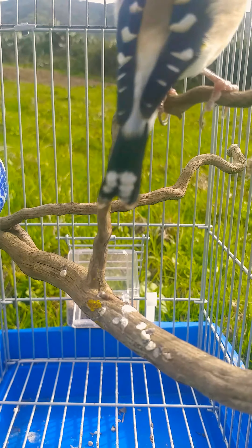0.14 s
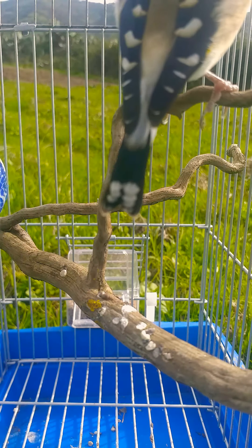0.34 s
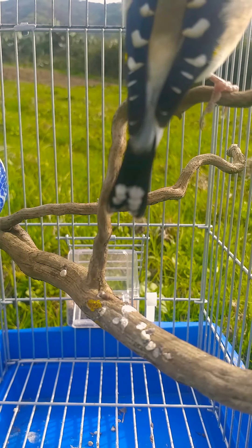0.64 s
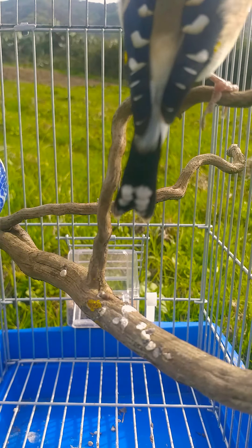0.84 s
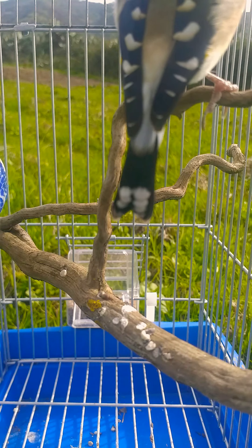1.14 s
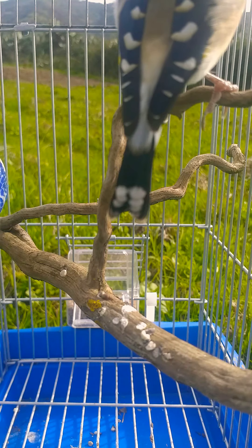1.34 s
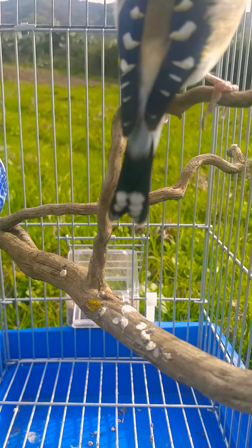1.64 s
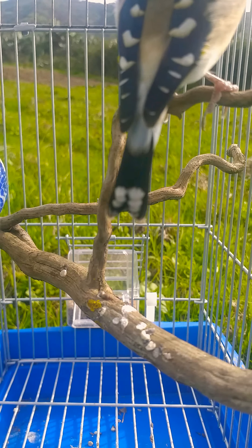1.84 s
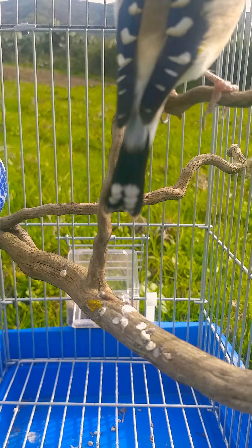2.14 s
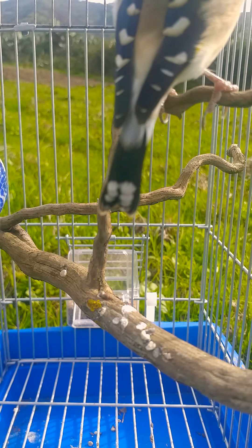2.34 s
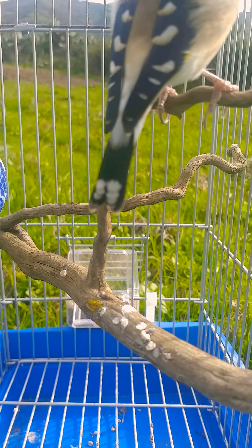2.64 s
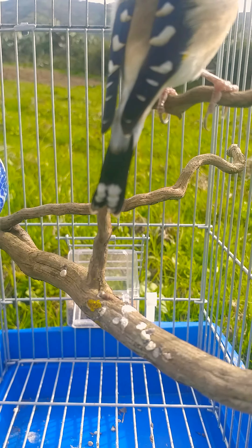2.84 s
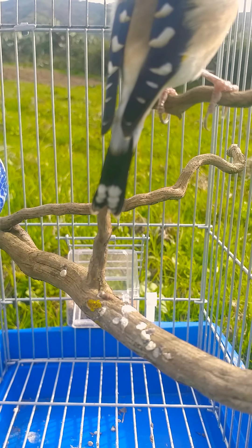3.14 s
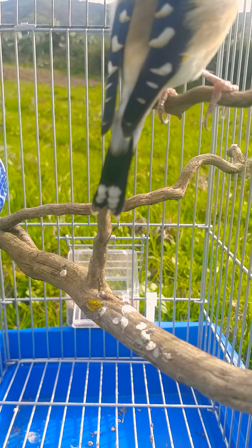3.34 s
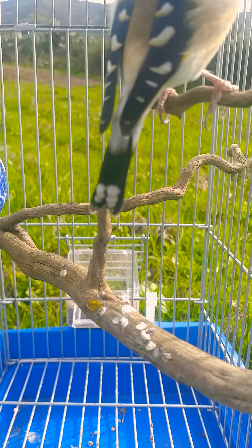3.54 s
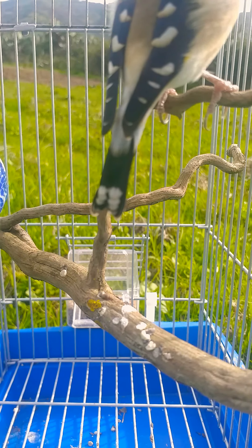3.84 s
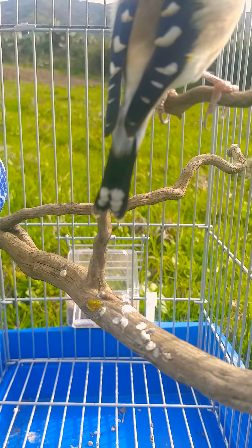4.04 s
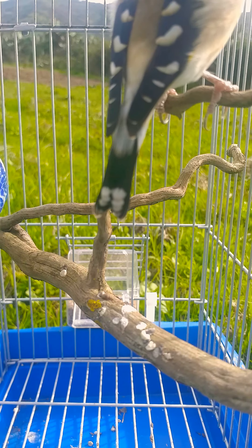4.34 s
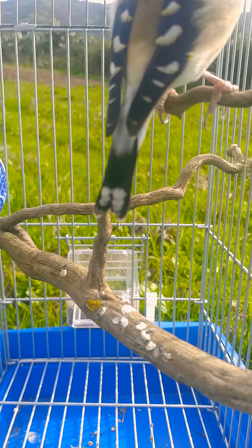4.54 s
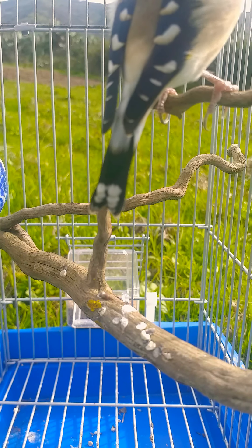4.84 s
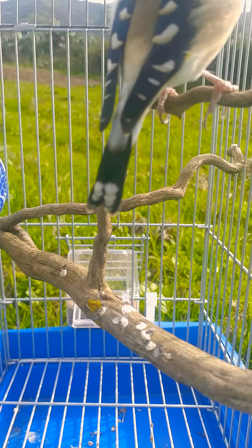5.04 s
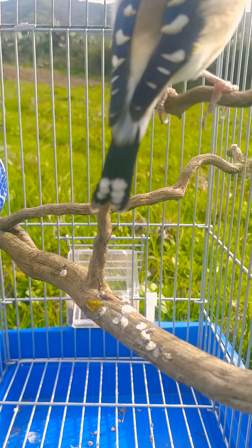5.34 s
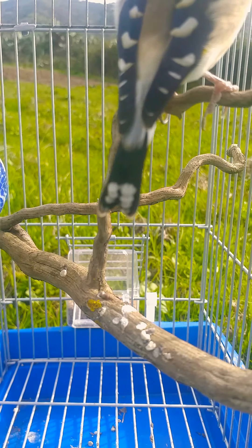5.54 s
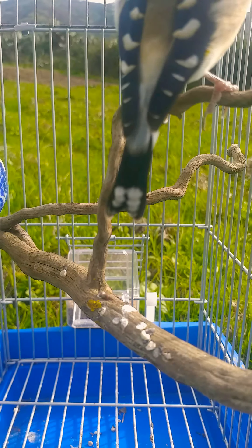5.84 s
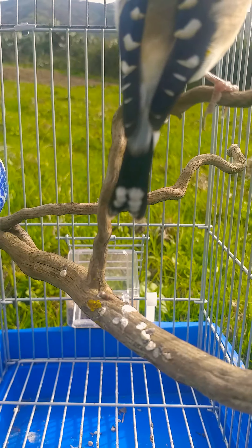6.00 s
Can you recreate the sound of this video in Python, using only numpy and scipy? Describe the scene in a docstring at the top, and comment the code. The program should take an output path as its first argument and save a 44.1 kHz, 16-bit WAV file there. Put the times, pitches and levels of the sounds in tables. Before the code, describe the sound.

A caged finch close by pours out a fast, bright twittering song ending in a falling buzz, then a fainter bird whistles in quiet open air.

```python
"""From the start a goldfinch sings close by in a wire cage outdoors: quick gliding syllables, many of them
two-voiced from both sides of the syrinx, closing after 2.5 s on a falling buzz; it sounds again at the end.
From 1.8 s a second songbird answers from further off with wavering whistles, among them one echo of a
near note; pitch curves drive sines. A soft bump of low noise comes at 3.6 s; five faint hoots, falling
sines, are spread through the scene, over still air (coloured noise) and a low hum of two unsteady tones."""
import sys
import numpy as np
from scipy import signal
from scipy.fft import rfft, irfft
from scipy.io import wavfile
from scipy.ndimage import uniform_filter1d, minimum_filter1d

SR = 44100
rng = np.random.default_rng(int(sys.argv[2]) if len(sys.argv) > 2 else 0)


def transcribe(u):
    """Save the signal u as a 16-bit wav file named by the first command-line argument.

    u: samples, shape (n,) or (channels, n), limited to [-1, 1]; the rate is SR.
    q: integer samples, one column per channel.
    """
    v = np.clip(np.atleast_2d(u).T, -1, 1)
    q = np.round(v * 32767).astype(np.int16)
    wavfile.write(sys.argv[1], SR, q)


N = 272097   # scene length [samples]


def from_db(db):
    """Decibels to gain."""
    return 10 ** (np.asarray(db) / 20)


def rms_one(x):
    """Scale to unit rms."""
    return x / np.sqrt(np.mean(x ** 2) + 1e-20)


def colour(x, spectrum):
    """Filter by a (frequency [Hz], level [dB]) curve, drawn over log frequency."""
    hz, db = np.transpose(spectrum)
    bins = np.maximum(np.fft.rfftfreq(2 * N, 1 / SR), 1)
    gain = from_db(np.interp(np.log(bins), np.log(hz), db))
    return irfft(rfft(x, 2 * N) * gain)[:N]


def noise(spectrum):
    """Coloured noise of unit rms."""
    return rms_one(colour(rng.standard_normal(N), spectrum))


def drift(rate_hz):
    """Smooth random motion of unit rms: noise rolled off above the rate."""
    bins = np.fft.rfftfreq(N, 1 / SR)
    return rms_one(irfft(rfft(rng.standard_normal(N)) / (1 + (bins / rate_hz) ** 4), N))


def samples(start, end):
    """Sample indices of a note that fall in the scene, and how far through the note each is (0-1)."""
    at = np.arange(max(round(start * SR), 0), min(round(end * SR), N))
    return at, np.clip((at / SR - start) / (end - start), 0, 1)


def fade(progress, length_s, edge_s):
    """Ramp in and out at the ends of a note."""
    to_nearest_end_s = np.minimum(progress, 1 - progress) * length_s
    return np.sin(np.pi / 2 * np.clip(to_nearest_end_s / edge_s, 0, 1)) ** 2


def edges(at, edge_s):
    """Ramps at both ends of the audible part of a note."""
    return fade(np.linspace(0, 1, len(at)), len(at) / SR, edge_s)


def swell(progress, peak, depth_db, slow_rise=.45, curve=2.01):
    """Level in dB of a note that grows to one peak and dies away; an early peak means a stronger start."""
    peak = np.clip(peak, .05, .95)
    before = (peak - progress) / max(peak, slow_rise)
    after = (progress - peak) / (1 - peak)
    return -depth_db * np.maximum(before, after) ** curve   # the curve rounds the peak


def whistle(hz):
    """Complex sine that follows a pitch curve."""
    return np.exp(2j * np.pi * np.cumsum(hz) / SR)


# What throat and beak let out of the overtones: (frequency [Hz], level [dB])
THROAT_RESPONSE = [(2000, -41.5), (4000, 2), (7000, -14), (7700, -32), (8500, -43), (12000, -44.5),
                   (14500, -38), (16000, -57.5)]
# Tone colour of the noisy rasp added around the near bird's notes: (frequency [Hz], level [dB])
RASP_SPECTRUM = [(400, -62), (1100, -47.5), (2150, -30), (2900, -12.5), (7000, 4.5), (8500, -33.5),
                 (12500, -18), (16000, -31.5)]


def finch(third_db=-3, difference_db=-62, rasp_db=-57, strain_db=-51, clash_db=-39, catch_db=-27,
          catch_s=0.0046, coupling=.065):
    """All voices add up and distort together, giving overtones and combination tones, plus a noisy rasp."""
    tone, effort = np.zeros(N, complex), np.full(N, 1e-9)
    power, bright, catch = np.zeros(N), np.zeros(N), np.zeros(N)
    for at, note, overtone_db in [*finch_notes(), buzz()]:
        size = np.abs(note)
        tone[at] += note
        effort[at] += size
        power[at] += size ** 2
        bright[at] += size * from_db(overtone_db)
        # the rasp is stronger for a moment as a note starts and as it ends
        spit = np.exp(-np.arange(len(at)) / SR / catch_s)
        catch[at] += np.sqrt(np.mean(size) * size) * (spit + spit[::-1])
    swing = tone / effort
    voice = tone.real * (1 + coupling * (1 - np.abs(swing) ** 2))
    difference_tone = from_db(difference_db) * (np.abs(tone) ** 2 - power)
    second = bright * swing ** 2
    third = from_db(third_db) * np.sqrt(bright * effort) * swing ** 3
    overtones = colour((second + third).real, THROAT_RESPONSE)
    # bright notes, and two voices sounding at once, are rougher
    clash = np.sqrt(np.maximum(effort ** 2 - power, 0))
    roughness = from_db(rasp_db) * effort + from_db(strain_db) * bright
    roughness = roughness + from_db(clash_db) * clash + from_db(catch_db) * catch
    rasp = colour(2 * roughness * rng.standard_normal(N), RASP_SPECTRUM)
    return voice + difference_tone + overtones + rasp + chips() + buzz_second_voice()


def finch_notes(edge_s=0.0022, shimmer_db=2.2, flutter_share=.0035):
    """Yield each syllable as (samples, tone, overtone dB), with a slight flutter in pitch and level."""
    flutter, tremble = drift(350), drift(140)
    for at, hz, level_db, overtone_db in [*dips(), *falling_pairs(), *glides()]:
        level = from_db(level_db + shimmer_db * tremble[at]) * edges(at, edge_s)
        yield at, level * whistle(hz * (1 + flutter_share * flutter[at])), overtone_db


# Dips, a V in pitch:
# (start [s], end [s], final pitch [Hz], level before the gesture [dB], overtone strength [dB])
DIP_NOTES = [(-0.005, 0.039, 3810, -15, 4.5), (0.701, 0.745, 3788, -23.5, 7.5),
             (0.879, 0.916, 3714, -14.5, -8), (1.138, 1.173, 4083, -9.5, -3.5),
             (1.263, 1.298, 4162, -6, -11.5), (1.401, 1.43, 4090, -8.5, -7), (6.133, 6.171, 3930, -19, 9)]
# The gesture all dips share, weakest before its end at the bottom of the V:
# (share of the note [0-1], pitch [ratio to final pitch], level [dB])
DIP_GESTURE = [(0, 1.06, -4.5), (.1, .9, -4.5), (.19, .74, -12.5), (.29, .69, -15), (.43, .84, -6),
               (.54, .925, 1.5), (.72, .95, -2.5), (.88, .975, -9), (1, 1.0, -21.5)]


def dips():
    """Yield each dip as (samples, pitch Hz, level dB, overtone dB): one gesture, stretched and transposed."""
    share, ratio, shape_db = np.transpose(DIP_GESTURE)
    for start, end, final_hz, level_db, overtone_db in DIP_NOTES:
        at, progress = samples(start, end)
        hz = final_hz * np.interp(progress, share, ratio)
        yield at, hz, level_db + np.interp(progress, share, shape_db), overtone_db


# Falling pairs, both sides of the syrinx sliding down in parallel:
# (start [s], end [s], first pitch [Hz], lowest pitch [Hz], upper voice higher by [Hz],
#  upper voice later by [s], lower voice level [dB], upper voice level [dB],
#  loudest at [share of the note], overtone strength [dB])
PAIR_NOTES = [(0.099, 0.131, 5900, 4220, 2014, 0.0069, -12.5, -15, 0.23, 12),
              (0.594, 0.634, 5470, 4855, 1680, 0.0093, -15.5, -20, 0.45, 11),
              (0.967, 0.997, 5970, 4174, 1330, 0.0049, -11, -7, 0.41, 4.5),
              (1.082, 1.104, 4960, 4600, 1130, 0.0021, -6, -3.5, .24, 3.5),
              (1.204, 1.236, 6300, 4903, 1320, 0.0017, -9.5, -9.5, 0.53, 10),
              (1.332, 1.363, 6770, 5010, 1020, .002, -6.5, -12, .45, 8.5),
              (1.476, 1.5, 5950, 4730, 1160, 0.0006, -6.5, -9, 0.17, 4)]


def falling_pairs(depth_db=21, turn=0.85):
    """Yield both voices of each pair: they fall, bottom out and turn up a little as they fade."""
    for (start, end, first_hz, lowest_hz, gap_hz, late_s,
         lower_db, upper_db, peak, overtone_db) in PAIR_NOTES:
        for lag_s, above_hz, level_db in (0, 0, lower_db), (late_s, gap_hz, upper_db):
            at, progress = samples(start + lag_s, end)
            slide = (at / SR - start) / (end - start)
            # the pitch is lowest at the turn, a share of the note
            hz = lowest_hz + above_hz + (first_hz - lowest_hz) * (1 - slide / turn) ** 2
            yield at, hz, level_db + swell(progress, peak, depth_db), overtone_db


# Glides; rows that overlap at length sound two-voiced, rows that barely touch join into one arch.
# Ease 1 is a straight sweep; the higher the ease, the sooner the pitch levels off:
# (start [s], end [s], first pitch [Hz], last pitch [Hz], ease [exponent], level [dB],
#  loudest at [share of the note], overtone strength [dB])
GLIDE_NOTES = [(0.071, 0.096, 3240, 4620, 5.7, -22.5, 0.33, 16),
               (0.232, 0.262, 2440, 3310, 2.9, -25, 0.52, -5),
               (0.292, 0.317, 3800, 4920, 1.96, -24, 0.41, 2.5),
               (0.341, 0.369, 3055, 4330, 2.36, -25, 0.38, -0.5),
               (0.346, 0.367, 3800, 4550, 1, -24.5, 0.76, 4), (0.38, 0.391, 3900, 2640, 2.9, -32, 0.43, 0),
               (0.395, 0.419, 4670, 3690, 3.7, -21.5, 0.27, -3),
               (0.784, 0.792, 3570, 4950, 1.07, -20.5, 1, 12.5),
               (0.791, 0.832, 5260, 4290, 2.8, -13.5, 0.12, 9),
               (1.04, 1.056, 2650, 3670, 5.2, -8.5, 0.7, -3.5),
               (1.552, 1.581, 3520, 4460, 1.016, -6, .55, -11.5),
               (1.531, 1.555, 3263, 3560, 1.08, -15, 0.5, -5),
               (1.631, 1.659, 2435, 2918, 2.54, -22.5, 0.65, -9),
               (1.694, 1.744, 3150, 6496, 5.1, -12, 0.77, 9.5),
               (1.695, 1.718, 3950, 6020, 2.1, -12.5, 0.29, 11),
               (1.716, 1.74, 6230, 5530, 1.3, -16, 0.42, 10.5),
               (1.794, 1.83, 3240, 4235, 1.57, -8, 0.49, -6),
               (1.795, 1.825, 3870, 5910, 0.77, -6.5, 0.55, 5),
               (1.875, 1.904, 2456, 3070, 0.68, -27, 0.55, 1.5),
               (1.927, 1.952, 4550, 5170, 3.8, -9.5, 0.66, -8),
               (1.925, 1.959, 6150, 7220, 1.04, -20.5, 0.44, 8),
               (1.983, 2.029, 2700, 4577, 0.92, -13, 0.55, -9),
               (1.988, 2.025, 3050, 5960, 0.87, -5.5, 0.79, -4.5),
               (2.018, 2.036, 4830, 3480, 0.61, -17.5, 0.16, -8),
               (2.076, 2.105, 2470, 2955, 2.5, -23, 0.49, -10), (2.131, 2.154, 6810, 7210, 1, -19, 0.42, 7),
               (2.132, 2.153, 5100, 6430, 2, -21.5, 0.21, -6),
               (2.202, 2.245, 2564, 4130, 2.57, -14, 0.49, -21.5),
               (2.203, 2.241, 3600, 5584, 1.03, -6, 0.81, -10),
               (2.242, 2.27, 3350, 4600, 1.6, -7, 0.43, -13), (2.332, 2.347, 2200, 2650, 2.2, -35, .7, 15),
               (2.346, 2.375, 2350, 3057, 4, -18, 0.39, -11.5),
               (2.407, 2.423, 4720, 4770, 1, -18.5, 0.22, -12),
               (2.409, 2.425, 5770, 5515, 1.45, -9.5, 0.71, -2),
               (2.427, 2.451, 5500, 2650, 0.84, -9.5, 0.37, -21.5)]


def glides(depth_db=21.5):
    """Yield each glide: the pitch eases from its first value to its last under a single swell."""
    for start, end, first_hz, last_hz, ease, level_db, peak, overtone_db in GLIDE_NOTES:
        at, progress = samples(start, end)
        hz = last_hz + (first_hz - last_hz) * (1 - progress) ** ease
        yield at, hz, level_db + swell(progress, peak, depth_db), overtone_db


# Tiny upward chips, some leading into syllables: (centre time [s], centre pitch [Hz], level [dB])
CHIP_NOTES = [(1.0371, 4200, -31), (1.1362, 4600, -36), (1.3339, 6110, -32), (1.3956, 3860, -40.5),
              (1.5285, 3960, -34), (1.538, 4786, -27), (1.548, 5010, -28.5), (1.6307, 3900, -28),
              (1.637, 4300, -30), (1.8756, 3950, -33), (2.2004, 4320, -31), (2.5129, 5720, -16.5),
              (2.5304, 6900, -25.5), (6.129, 4020, -44.5)]


def chips(length_s=0.0057, sweep=.3):
    """Each chip is a few milliseconds of tone swept upward."""
    out = np.zeros(N)
    for centre, hz, level_db in CHIP_NOTES:
        at, progress = samples(centre - length_s / 2, centre + length_s / 2)
        tone = whistle(hz * (1 + sweep * (progress - .5))).real
        out[at] += from_db(level_db) * np.sin(np.pi * progress) ** 2 * tone
    return out


BUZZ_START_S, BUZZ_END_S, PUFFS_PER_S = 2.5365, 2.753, 103.6
BUZZ_DB, BUZZ_HOLD_S, BUZZ_FADE_DB_PER_S = -3.5, 0.088, 160
BUZZ_TAIL_DB, BUZZ_RELEASE_S = -15, .026   # the level at which it lingers, and its final release
BUZZ_OVERTONE_DB, BUZZ_BRIGHTENS_DB = -8.5, 25   # overtones at the start, and their gain by the end
# The closing buzz slides down: (time [s], pitch with the syrinx open [Hz])
BUZZ_PITCH = [(2.537, 4975), (2.581, 4397), (2.621, 3698), (2.681, 3240), (2.753, 3037)]


def buzz(relax=.6, roundness=1.2, leak=0.19, edge_s=0.0011, unevenness=.11, shimmer_db=1.83, lean=0.2,
         pinch_bend=.3, jitter=.012):
    """The syrinx pinches shut about 100 times a second, ever less tightly, each time bending pitch up."""
    at, progress = samples(BUZZ_START_S, BUZZ_END_S)
    age = at / SR - BUZZ_START_S
    cycle = (PUFFS_PER_S * age + unevenness * np.sqrt(progress) * drift(50)[at]) % 1
    # each puff opens faster than it closes
    opening = np.abs(np.sin(np.pi * (cycle + lean * np.sin(np.pi * cycle))))
    bend = pinch_bend * (1 - relax * progress) * (1 - opening) ** 3
    pitch = np.interp(at / SR, *np.transpose(BUZZ_PITCH)) * (1 + bend + jitter * drift(150)[at])
    flow = leak * progress + (1 - leak * progress) * opening ** roundness
    level_db = BUZZ_DB - BUZZ_FADE_DB_PER_S * np.maximum(age - BUZZ_HOLD_S, 0)
    level_db = np.maximum(level_db, BUZZ_TAIL_DB)
    release = np.clip((BUZZ_END_S - at / SR) / BUZZ_RELEASE_S, 0, 1)
    level = from_db(level_db + shimmer_db * drift(80)[at]) * flow * release
    level = level * fade(progress, len(at) / SR, edge_s)
    return at, level * whistle(pitch), BUZZ_OVERTONE_DB + BUZZ_BRIGHTENS_DB * progress ** 3


def buzz_second_voice(hz=4350, level_db=-32, start_s=2.683, edge_s=.012, jitter=0.031):
    """The other side of the syrinx joins the end of the buzz with a soft, rough tone."""
    out = np.zeros(N)
    at, progress = samples(start_s, BUZZ_END_S)
    tone = whistle(hz * (1 + jitter * drift(350)[at])).real
    out[at] = from_db(level_db) * fade(progress, len(at) / SR, edge_s) * tone
    return out


# The soft hiss that lies under the high calls: (frequency [Hz], level [dB])
HISS_SPECTRUM = [(3000, -30), (5000, -8.5), (6800, 0), (8000, -4.5), (9000, -29.5)]


def further_bird(overtone_db=-30, hiss_db=-26):
    """Pure whistles; the high calls carry a faint octave and some hiss."""
    high = wavering(high_calls(), jitter=0.0077)
    octave = from_db(overtone_db) * np.cos(2 * np.angle(high))
    hiss = from_db(hiss_db) * noise(HISS_SPECTRUM)
    return (wavering(further_whistles()) + high).real + np.abs(high) * (octave + hiss)


def wavering(notes, edge_s=0.0017, jitter=0.012, shimmer_db=3.0):
    """Join notes into one complex whistle that wavers in pitch and level."""
    out, flutter, tremble = np.zeros(N, complex), drift(130), drift(100)
    for at, hz, level_db in notes:
        level = from_db(level_db + shimmer_db * tremble[at]) * edges(at, edge_s)
        out[at] += level * whistle(hz * (1 + jitter * flutter[at]))
    return out


# Further whistles, with one echo of a near note at 2.26 s:
# (start [s], end [s], first pitch [Hz], middle pitch [Hz], last pitch [Hz], level [dB])
FURTHER_WHISTLES = [(2.043, 2.065, 5660, 5110, 5500, -31.5), (2.061, 2.104, 5420, 4300, 4056, -30),
                    (2.104, 2.147, 4110, 3960, 3220, -34), (2.139, 2.184, 5180, 4380, 4560, -28),
                    (2.263, 2.304, 4694, 4560, 4492, -36), (2.309, 2.349, 3440, 3985, 3890, -30),
                    (2.335, 2.384, 3540, 3077, 3740, -41), (2.453, 2.551, 3430, 3533, 3180, -47),
                    (3.457, 3.485, 4220, 4490, 4860, -51), (3.486, 3.513, 3610, 3304, 2790, -54),
                    (3.509, 3.539, 3790, 3500, 4400, -43.5), (3.53, 3.55, 3800, 3150, 2752, -57),
                    (3.554, 3.577, 3790, 3300, 3050, -53.5), (3.58, 3.626, 3360, 3310, 3410, -43.5),
                    (3.628, 3.688, 2860, 3487, 3700, -41.5), (3.687, 3.725, 3510, 3127, 2850, -49.5),
                    (3.797, 3.914, 2870, 3385, 3574, -59.5), (3.997, 4.058, 2200, 2700, 2850, -71.5),
                    (4.102, 4.184, 3348, 3780, 3825, -39.5), (4.241, 4.402, 3020, 3474, 3760, -60.5),
                    (4.384, 4.476, 4120, 3960, 3820, -60)]


def further_whistles(peak=.45, depth_db=10):
    """Yield each whistle as (samples, pitch Hz, level dB): an arc through three pitches."""
    for start, end, first_hz, middle_hz, last_hz, level_db in FURTHER_WHISTLES:
        at, progress = samples(start, end)
        arc = np.polyfit([0, .5, 1], [first_hz, middle_hz, last_hz], 2)
        yield at, np.polyval(arc, progress), level_db + swell(progress, peak, depth_db)


# The further bird's thin high calls, pitches before vibrato:
# (start [s], end [s], first pitch [Hz], last pitch [Hz], level [dB])
HIGH_CALL_NOTES = [(1.755, 1.85, 7970, 8500, -60.5), (2.763, 2.812, 8420, 7900, -52),
                   (2.809, 2.881, 8100, 7720, -46), (2.905, 3.012, 7730, 7880, -46.5),
                   (3.064, 3.163, 7370, 7440, -41), (3.212, 3.371, 8320, 7520, -53)]


def high_calls(vibrato_hz=48, widest_vibrato=0.032, peak=0.64, depth_db=8):
    """Yield each high call likewise: a straight slide with a fast vibrato, wider in louder calls."""
    loudest_db = max(level_db for *_, level_db in HIGH_CALL_NOTES)
    for start, end, first_hz, last_hz, level_db in HIGH_CALL_NOTES:
        at, progress = samples(start, end)
        depth = widest_vibrato * np.sqrt(from_db(level_db - loudest_db))
        vibrato = depth * np.cos(2 * np.pi * vibrato_hz * (at / SR - start))
        hz = (first_hz + (last_hz - first_hz) * progress) * (1 + vibrato)
        yield at, hz, level_db + swell(progress, peak, depth_db)


def scatter(x, t60):
    """Diffuse tail sent back by cage, ground and plants; longer tails also build up more slowly."""
    t = np.arange(SR) / SR
    tail = rng.standard_normal(SR) * from_db(-60 * t / t60) * (1 - np.exp(-40 * t / t60))
    return signal.fftconvolve(x, tail / np.sqrt(np.sum(tail ** 2)))[:N]


# Faint falling hoots far away: (start [s], length [s], first pitch [Hz], peak level [dB])
HOOT_NOTES = [(0.509, 0.26, 937, -67.5), (1.939, 0.25, 940, -74.5), (3.558, 0.18, 936, -82.5),
              (4.671, 0.26, 936, -78.5), (5.71, 0.17, 936, -78)]


def hoots(fall=0.0441, jitter=.004):
    """Each hoot swells and dies away while its pitch sags."""
    out, waver = np.zeros(N), drift(40)
    for start, length, first_hz, level_db in HOOT_NOTES:
        at, progress = samples(start, start + length)
        hz = first_hz * (1 - fall * progress ** 2 + jitter * waver[at])
        out[at] += from_db(level_db) * np.sin(np.pi * progress) * whistle(hz).real
    return out


# Tone colour of the soft low bump: (frequency [Hz], relative level [dB])
BUMP_COLOUR = [(100, -23), (220, 11.5), (360, 5), (600, -19), (1500, -40)]


def bump(start_s=3.64, length_s=0.097, level_db=-67):
    """A short swell of low noise."""
    out = np.zeros(N)
    at, progress = samples(start_s, start_s + length_s)
    out[at] = from_db(level_db) * np.sin(np.pi * progress) * noise(BUMP_COLOUR)[at]
    return out


# Tone colour of the outdoor air: (frequency [Hz], relative level per Hz [dB])
AIR_SPECTRUM = [(25, -35.5), (40, -21), (55, -5), (140, -6), (200, -18.5), (450, -25.5), (1400, -34.5),
                (4000, -34.5), (10000, -40.5), (13000, -38), (16000, -41.5)]
# Distant hum tones: (frequency [Hz], bandwidth [Hz], rms level [dB])
HUM_TONES = [(65.7, 7.4, -67.5), (122.7, 5.6, -69)]


def background(air_db=-66.5):
    """Still air as steady coloured noise, with two hum tones that drift in level and phase."""
    t = np.arange(N) / SR
    out = from_db(air_db) * noise(AIR_SPECTRUM)
    for hz, width_hz, level_db in HUM_TONES:
        wander = drift(width_hz / 2) + 1j * drift(width_hz / 2)
        out += from_db(level_db) * rms_one((wander * np.exp(2j * np.pi * hz * t)).real)
    return out


def scene():
    """The near bird is almost dry, the further one has more scatter; each has an early and a late tail."""
    near, far = finch(), further_bird()
    near = near + from_db(-30) * scatter(near, t60=.09) + from_db(-43.5) * scatter(near, t60=0.27)
    far = far + from_db(-7.0) * scatter(far, t60=0.14) + from_db(-15.0) * scatter(far, t60=0.49)
    return (near + far + hoots() + bump() + background())[None]


def record(dry, ceiling=0.91, cutoff_hz=16000):
    """The top is cut steeply, and a fast limiter holds the loudest peaks under full scale."""
    x = signal.sosfilt(signal.ellip(10, .1, 70, cutoff_hz, fs=SR, output="sos"), dry)
    room_left = np.minimum(1, ceiling / (np.abs(x) + 1e-9))
    gain = uniform_filter1d(minimum_filter1d(room_left, size=257), size=257)
    return x * gain


dry = scene()
out = record(dry)
transcribe(out)
```